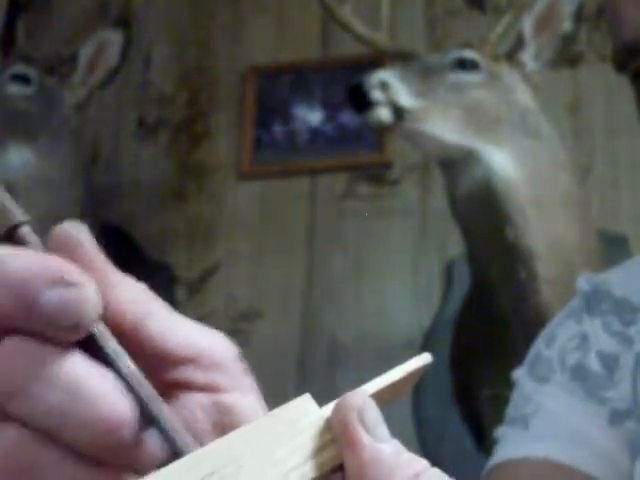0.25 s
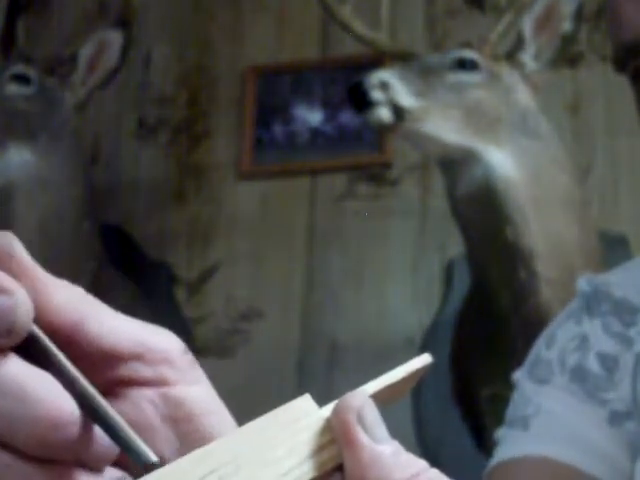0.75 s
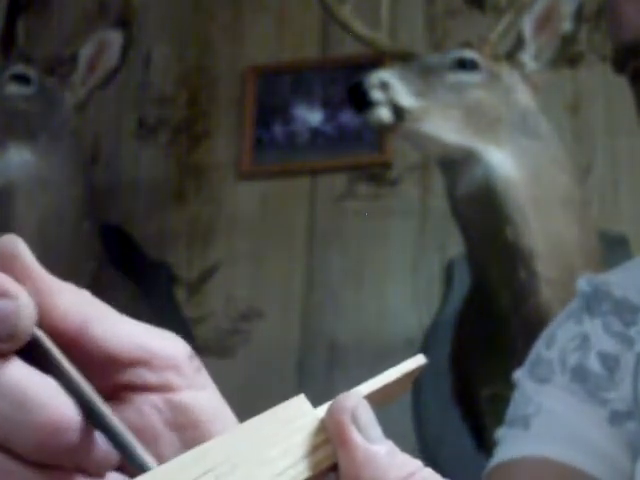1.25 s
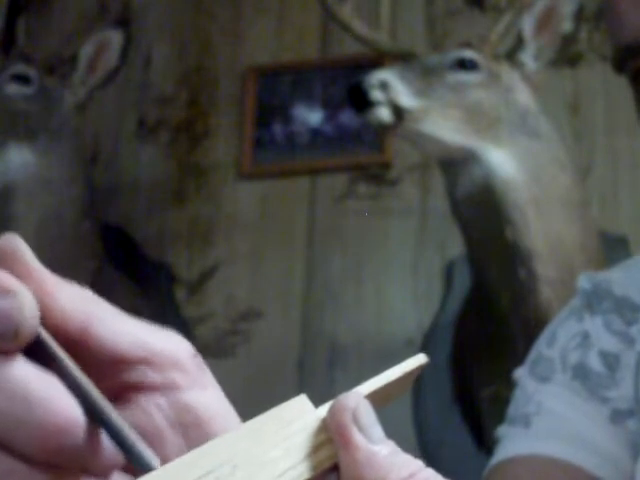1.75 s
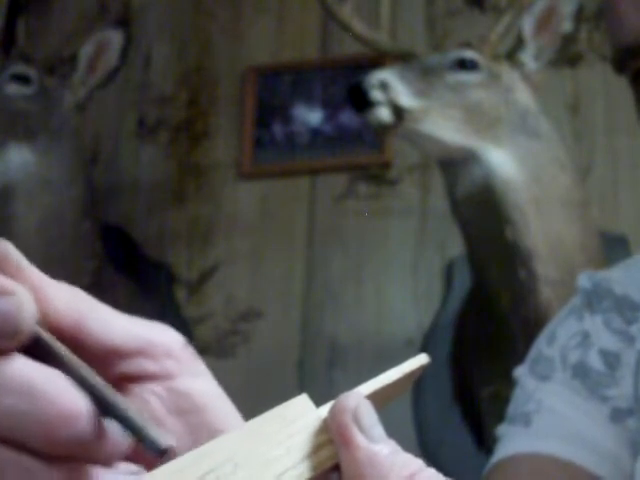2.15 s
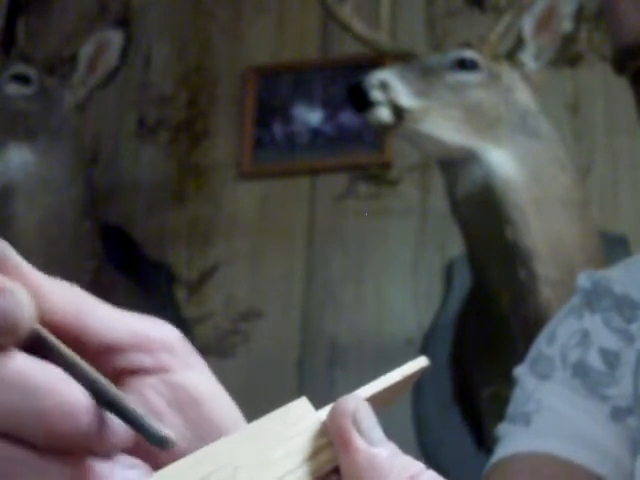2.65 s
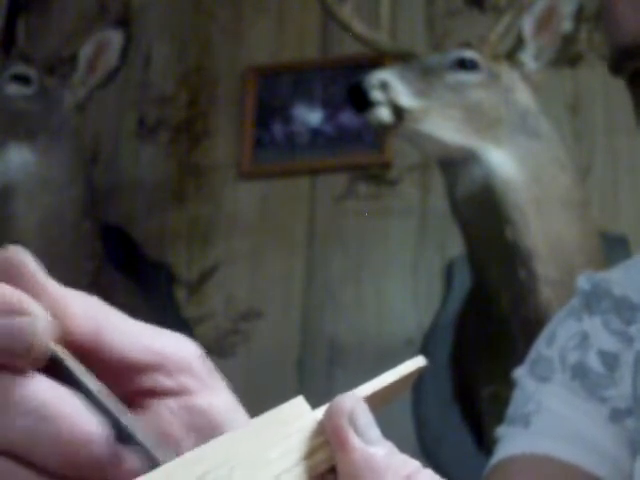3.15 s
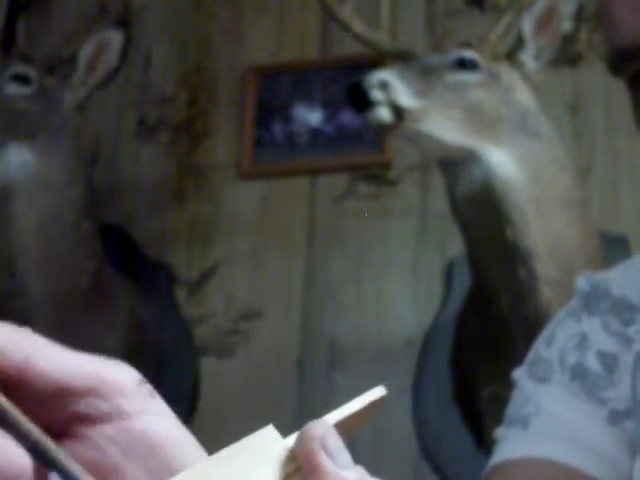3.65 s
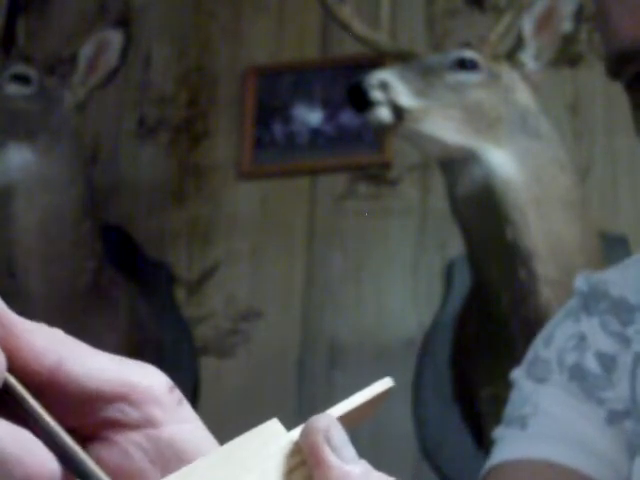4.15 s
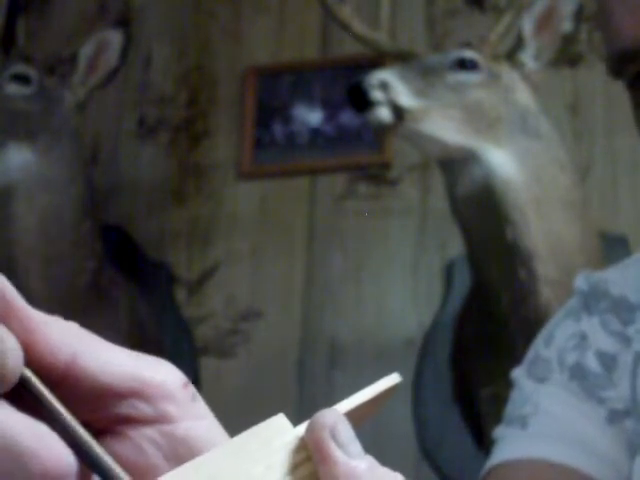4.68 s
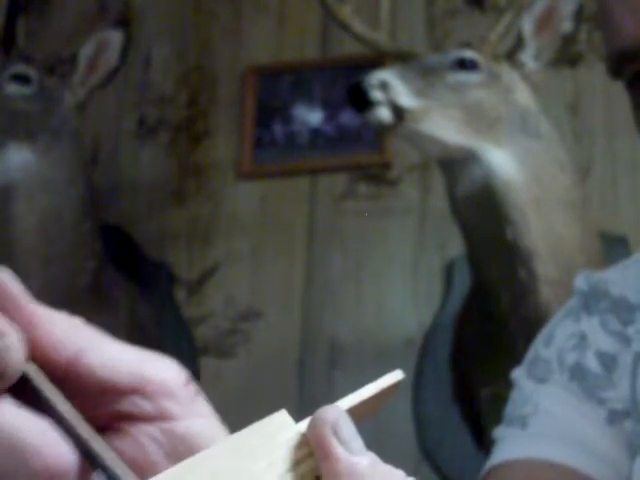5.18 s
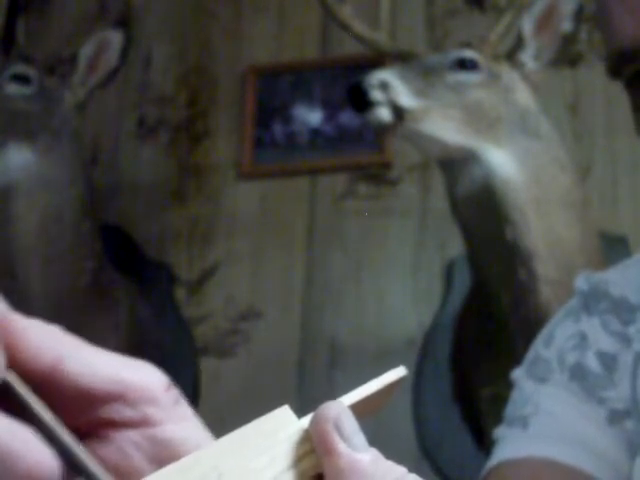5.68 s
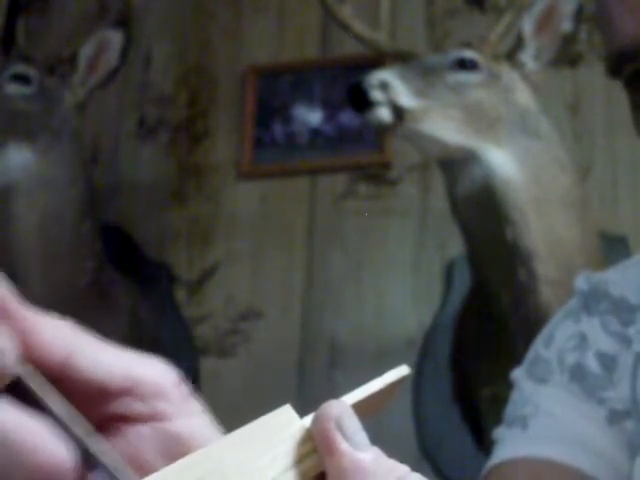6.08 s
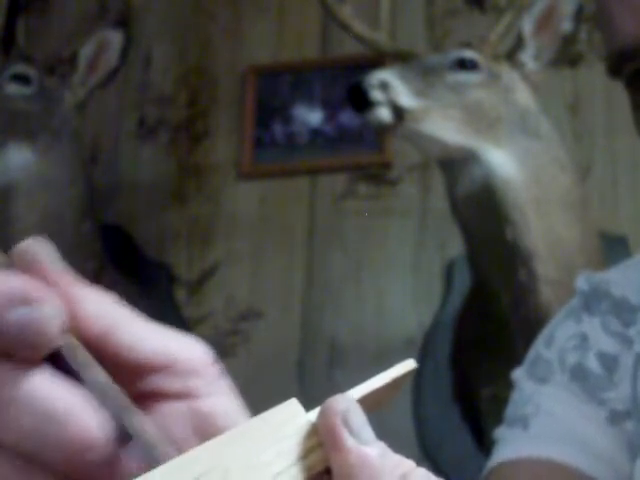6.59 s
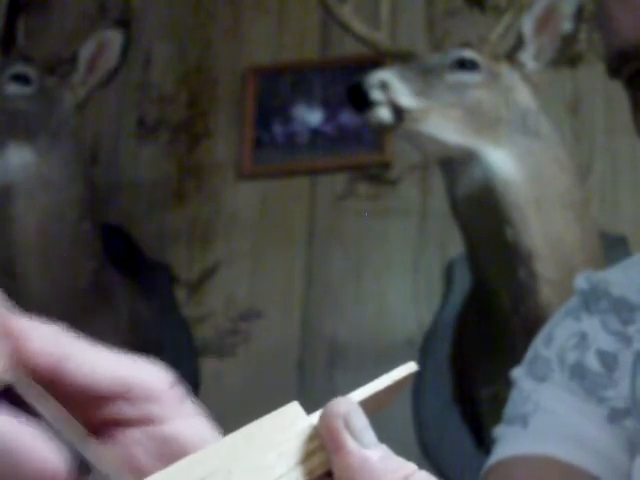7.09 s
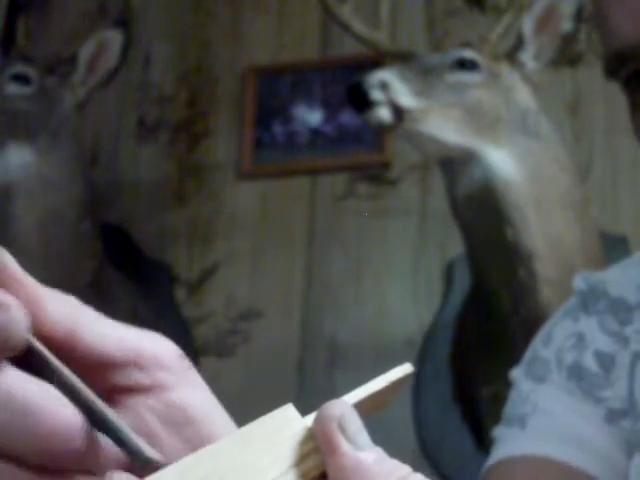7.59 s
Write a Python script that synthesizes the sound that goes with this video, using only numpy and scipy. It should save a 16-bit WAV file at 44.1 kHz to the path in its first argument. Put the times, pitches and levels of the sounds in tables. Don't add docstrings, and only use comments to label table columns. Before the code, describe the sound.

Wood scraped on wood yelps nasally twice, clucks in a string of short sharp cuts, then yelps softly to firmly and ends with two jabs.

```python
import sys
import numpy as np
from scipy import signal
from scipy.fft import rfft, irfft, next_fast_len
from scipy.io import wavfile
from scipy.ndimage import map_coordinates

SR = 44100
rng = np.random.default_rng(int(sys.argv[2]) if len(sys.argv) > 2 else 0)


def amplitude_ratio(level_db):
    exponent = np.asarray(level_db, float) / 20
    return 10 ** exponent


def generate_wav(signal):
    frames = np.transpose(np.atleast_2d(signal))
    scaled = np.clip(frames, -1, 1) * 32767
    pcm = np.round(scaled).astype(np.int16)
    wavfile.write(sys.argv[1], SR, pcm)


N = 345300

# frequency_hz, density_db
HUSH_COLOUR = [(12, -39), (20, -1.5), (61, -4.5), (139, -9.5), (235, -9.5), (302, -11.5), (357, -12),
               (753, -18.5), (818, -17.5), (1420, -22), (1550, -22.5), (12000, -41.5), (15000, -57)]
# frequency_hz, rms_db
WHINE = (11800, -103)
# centre_hz, width_hz
HOUSING_DIP = (7850, 420)
# frequency_hz, t60_s
ROOM_DECAY = [(400, 0.15), (1000, 0.24), (1500, 0.18), (2200, 0.23), (3400, 0.24), (5000, 0.31),
              (7000, 0.25), (12000, 0.27)]
# centre_hz, width_hz, level_db
BOX_MODES = [(657, 430, -10.5), (920, 146, -5), (1349, 291, 4), (1893, 263.5, 5.5), (2100, 213, 3),
             (2897, 204, 4.5), (3450, 191, 2.5), (4036, 783, -10.5), (4814, 210, -11.5), (6530, 430, -11),
             (7300, 100, -42.5), (8120, 170, -24), (11940, 490, -27)]
# centre_hz, width_hz, level_db
PLATE_MODES = [(1351, 31, -18.5), (3420, 38, -0.5), (6600, 67, -6.5)]
# centre_hz, width_hz, level_db
THUD_MODE = (430, 330, -15)
# centre_hz, width_hz, level_db
SQUEAK_MODE = (1373, 60, 10)
# frequency_hz, level_db
CRACK_COLOUR = [(11000, -88), (12300, -36), (14800, -35.5), (15800, -56.5)]
# frequency_hz, level_db
DRAG_COLOUR = [(300, 5), (1500, -6), (4000, -3), (7000, 7), (12000, 10)]
# frequency_hz, level_db
GRIT_COLOUR = [(300, -12.5), (1500, -4.5), (3000, 3.4), (4500, 1.5), (7000, 10), (9000, 10), (12000, 5)]
# frequency_hz, level_db
SLIP_COLOUR = [(300, 14), (1000, 0), (3500, -0.95), (5000, -7), (7000, -4), (8500, 0), (12000, -5)]
# start_s, length_s, level_db
RETURN_STROKES = [
    (-.06, 0.13, -56.5),
    (0.289, 0.13, -58),
    (4.77, 0.12, -73.5),
    (5.206, 0.1, -65.5),
    (5.57, 0.087, -62.5),
    (5.931, 0.11, -60),
    (6.284, 0.12, -61),
    (6.622, 0.12, -58),
    (6.949, 0.15, -61.5),
    (7.305, 0.093, -72),
]
# start_s, peak_db
TOUCHES = [
    (4.461, -61),
    (5.728, -61),
]
# start_s, peak_db, length_s, swell_db, strike_db
JABS = [(1.165, -24, 0.022, -3, -11), (1.39, -18.5, 0.025, 2.5, -15), (1.614, -21.5, 0.033, -3, 9.5),
        (1.851, -18.5, 0.025, 4, 0.5), (2.092, -19.5, 0.022, 9, 3), (2.343, -17, 0.026, -1.5, 0.5),
        (2.602, -17, 0.025, 4.5, 4), (2.875, -16.5, 0.027, 4, -3), (3.21, -16.5, 0.022, -1.5, 3.5),
        (7.549, -17.5, 0.028, 2.5, 0), (7.757, -12.5, 0.029, 5, -1)]
# start_s, rise_s, fall_s, peak_db
CHATTERS = [
    (5.05, 0.034, 0.063, -62),
    (5.765, 0.0043, 0.053, -51),
    (6.116, 0.0043, 0.077, -57),
    (6.47, 0.044, 0.011, -44),
    (6.799, .035, .05, -40),
    (7.126, 0.032, 0.043, -39),
]
# time_s, slip_rate_hz, level_db
LIGHT_YELPS = [
    [(4.608, 812, -67), (4.64, 778, -52.5), (4.662, 820, -47.5), (4.673, 957, -47.5), (4.685, 846, -45.5),
     (4.71, 787, -68), (4.73, 765, -73)],
    [(5.005, 876, -60), (5.02, 759, -56), (5.085, 712, -46.5), (5.115, 723, -53), (5.14, 773, -50),
     (5.168, 872, -60.5), (5.18, 772, -70), (5.215, 770, -69)],
    [(5.403, 697, -67), (5.42, 700.6, -54), (5.452, 719, -46.5), (5.478, 701, -36), (5.5, 750, -44),
     (5.515, 754, -42), (5.54, 750, -63)],
    [(5.745, 699, -69), (5.778, 734.4, -46.5), (5.8, 713, -36), (5.855, 721, -33), (5.878, 724.4, -39),
     (5.893, 920, -42), (5.902, 1040, -48)],
]
# start_s, length_s, locked_rate_hz, peak_db, roll_0_to_1 (swing of the peg round its oval)
FIRM_YELPS = [
    (6.105, 0.15, 685.7, -30, 0.72),
    (6.453, 0.15, 685.2, -30.5, 0.44),
    (6.786, .16, 680.2, -31, 0.12),
    (7.115, 0.15, 672, -28.5, 0),
]
# time_s, slip_rate_hz, level_db
ROUND_YELPS = [
    [(0.117, 996, -64), (.122, 938, -54), (.138, 739, -42.5), (.175, 727, -35.5), (.215, 741.5, -31.5),
     (.238, 807, -33), (.252, 1032, -37), (.264, 1210, -47)],
    [(.466, 1070, -54), (.47, 1015, -47.5), (.48, 921, -41.5), (.503, 761, -37.5), (.52, 734.6, -34.5),
     (.56, 738.7, -32), (.585, 764, -32), (.597, 1010, -41.5), (.607, 1100, -46)],
]

SMOOTH = .02
FRAY = 0.24
SHINE_DB = 2


def along(points, hz):
    f, v = np.transpose(points)
    return np.interp(np.log(hz + 1), np.log(f + 1), v)


def filtered(x, response):
    m = next_fast_len(len(x) + SR // 2)
    spectrum = rfft(x, m) * response(np.fft.rfftfreq(m, 1 / SR))
    return irfft(spectrum, m)[:len(x)]


def coloured(x, points):
    return filtered(x, lambda f: amplitude_ratio(along(points, f)))


def resonance(f, centre_hz, width_hz, db):
    return amplitude_ratio(db) * 1j * f * width_hz / (centre_hz ** 2 - f * f + 1j * f * width_hz)


def hush():
    noise = filtered(rng.standard_normal(N),
                     lambda f: amplitude_ratio(along(HUSH_COLOUR, f)) / (1 + (f / 12700) ** 30))
    hz, rms_db = WHINE
    line = np.sqrt(2) * amplitude_ratio(rms_db) * np.sin(2 * np.pi * hz * np.arange(N) / SR)
    return amplitude_ratio(-68.5) * noise / noise.std() + line


def room(x):
    hz, t, z = signal.stft(rng.standard_normal(SR // 2), SR, nperseg=256)
    decay = amplitude_ratio(-60 * t / along(ROOM_DECAY, hz)[:, None])
    tail = signal.istft(z * decay, SR, nperseg=256)[1]
    delayed = np.pad(x, (150, 0))
    return signal.fftconvolve(delayed, tail / np.linalg.norm(tail))[:N]


def box(f):
    ring = sum((-1) ** k * resonance(f, *row) for k, row in enumerate(BOX_MODES))
    first, second, third = [resonance(f, *row) for row in PLATE_MODES]
    ring = ring + first + second - third
    ring = ring * (1j * f / 520) ** 2 / (1 + 1j * f / 520) ** 2
    ring = ring * (amplitude_ratio(-36) + amplitude_ratio(-13) / (1 + (f / 13300) ** 60) + 1 / (1 + (f / 12250) ** 60))
    return ring / np.sqrt(np.mean(abs(ring) ** 2))


def returns():
    t = np.arange(N) / SR
    touch = np.zeros(N)
    for s, length, db in RETURN_STROKES:
        touch += amplitude_ratio(db) * np.sin(np.pi * np.clip((t - s) / length, 0, 1)) ** 0.59
    clumps = amplitude_ratio(1.23 * map_coordinates(rng.standard_normal(N // 400 + 4), [np.arange(N) / 400]))
    squeak = lambda f: 1 + resonance(f, *SQUEAK_MODE)
    return filtered(touch * clumps * rng.standard_normal(N),
                    lambda f: amplitude_ratio(along(DRAG_COLOUR, f)) * squeak(f))


def stroke(rows):
    s, *cols = np.transpose(rows)
    at = np.arange(round(s[0] * SR), min(round(s[-1] * SR), N))
    rate_hz, db, rough = [np.interp(at / SR, s, c) for c in cols]
    rough = np.clip(rough, 0, .95)
    chance = rng.standard_normal((400, 3))
    sand = rng.standard_normal(SR // 2)[:len(at)]

    wander = map_coordinates(chance[:, 0], [np.arange(len(at)) * 260 / SR])
    turns = np.cumsum(rate_hz * (1 + 0.076 * rough * wander)) / SR
    whole = np.arange(int(turns[-1]))
    jitter = chance[whole, 1] * (0.005 + 0.12 * np.interp(whole, turns, rough))
    when = np.interp(whole + jitter, turns, at)
    gain = amplitude_ratio(db) * np.sqrt((1 - rough) * SR / rate_hz)
    size = np.interp(when, at, gain) * amplitude_ratio(chance[whole, 2] * 4.5 * np.interp(when, at, rough))

    spots = when.astype(int)[:, None] + np.arange(-8, 9)
    lag = spots - when[:, None]
    shape = size[:, None] * np.sinc(lag) * np.cos(lag * np.pi / 18) ** 2
    slips = np.bincount(spots.ravel(), shape.ravel(), N + SR)

    sharp = np.clip(1 + (np.interp(np.arange(N + SR), at, db) + 36.5) / 22, .05, 1)
    gate = 1 + 0.64 * np.cos(2 * np.pi * turns)
    dust = 0.47 * amplitude_ratio(db) * np.sqrt(rough + 0.002) * gate * sand
    grit = np.bincount(at, dust, N + SR) * sharp ** .4
    return np.array([sharp * slips, (1 - sharp) * slips, grit])


def chatter(s, rise, fall, db):
    loose = 0.23
    curve = [(0, -14, loose), (rise, 0, .5 * loose), (rise + fall, -20, loose)]
    return [(s + t, 950 - 700 * t, db + under_db, rough) for t, under_db, rough in curve]


def jab(s, db, length, swell_db):
    db = db - 13.5
    high_hz = 930 + 25 * rng.standard_normal()
    low_hz = 680 + 18 * rng.standard_normal()
    high = [(s, 1.04 * high_hz, db + .3, .4),
            (s + .6 * length, 0.87 * high_hz, db + swell_db / 2 - 0.5, .4),
            (s + length, 0.74 * high_hz, db - 7.0, .4)]
    low = [(s, low_hz, db - 7.0, .4),
           (s + 0.91 * length, low_hz, db + swell_db - 3.0, .33),
           (s + length, low_hz, db + swell_db - 9.5, .3),
           (s + length + .006, low_hz, db - 11.0, .5)]
    return stroke(high) + stroke(low)


def light_yelp(rows):
    peak_db, peak_s = max((db, s) for s, hz, db in rows)
    weak = .005 * (-33 - peak_db)
    curve = []
    for s, hz, db in rows:
        blur = SMOOTH + .04 * max(peak_db - db - 4, 0)
        limit = 0.435 if s < peak_s else 0.51 * FRAY
        curve.append((s, hz, db, min(blur, limit) + weak))
    return curve, 1.5


def firm_yelp(s, length, hz, db, roll):
    land_s, grab_s = .0025, 0.0077
    grab_hz, grab_db = 1016, db - 19
    rasp = SMOOTH + 0.36 * max(1 - roll, 0)
    push = .007 * (db + 31)
    ease = 1.035 + push
    curve = [(s, grab_hz, grab_db - 13, SMOOTH),
             (s + land_s, grab_hz, grab_db, 0.18 * rasp),
             (s + land_s + grab_s, 870, db - 14, 0.47 * rasp),
             (s + land_s + 2 * grab_s, 1.03 * hz, db - 14, rasp),
             (s + 0.413 * length, hz, db - 1.5, .62 * rasp),
             (s + .62 * length, (1.014 + push) * hz, db, SMOOTH),
             (s + 0.8 * length, (1.035 + 1.5 * push) * hz, db - 0.1 - 10.5 * roll, SMOOTH),
             (s + .91 * length, (ease + 0.253 * roll) * hz, db - 15.5, 0.67 * FRAY),
             (s + length, (ease + 0.85 * roll) * hz, db - 33, FRAY)]
    return curve, SHINE_DB + .6 * (db + 30.5)


def round_yelp(rows):
    locked_hz = min(hz for s, hz, db in rows)
    curve = [(s, hz, db, .012 + 0.72 * (hz / locked_hz - 1) ** 2) for s, hz, db in rows]
    return curve, SHINE_DB + 4


def peg():
    draws, jabs = np.zeros((3, N + SR)), np.zeros((3, N + SR))
    shine = np.zeros(N + SR)
    yelps = [round_yelp(rows) for rows in ROUND_YELPS]
    yelps += [firm_yelp(*row) for row in FIRM_YELPS]
    yelps += [light_yelp(rows) for rows in LIGHT_YELPS]
    for rows, bright_db in sorted(yelps):
        draws += stroke(rows)
        start = round(rows[0][0] * SR)
        shine[start:start + SR // 5] = amplitude_ratio(bright_db) - 1
    for row in CHATTERS:
        draws += stroke(chatter(*row))
    for s, db, length, swell_db, strike_db in JABS:
        start = round(s * SR)
        jabs[0, start] = amplitude_ratio(db + strike_db)
        jabs += jab(s, db, length, swell_db)
        bright_db = min(1.04 * (db + 21), 4.5)
        shine[start:start + SR // 10] = amplitude_ratio(bright_db) - 1
    for s, db in TOUCHES:
        draws[1, round(s * SR)] = amplitude_ratio(db + 14)

    sharp, blunt, grit = draws + jabs
    slips = sharp + 3.3 * filtered(blunt, lambda f: 1 / (1 + 1j * f / 2400) ** 2)
    both = coloured(slips, SLIP_COLOUR) + coloured(grit, GRIT_COLOUR)
    squeak = filtered(both * shine, lambda f: 1 / (1 + (4500 / (f + 1)) ** 6))
    return (both + squeak)[:N], jabs.sum(axis=0)[:N]


def scene():
    force, jabs = peg()
    drag = returns()
    thud = filtered(jabs, lambda f: resonance(f, *THUD_MODE))
    crack = coloured(jabs + amplitude_ratio(1) * drag, CRACK_COLOUR)
    call = filtered(force + drag, box) + thud + crack
    return (amplitude_ratio(-1.0) * call + amplitude_ratio(-7) * room(call) + hush())[None]


def band_limit(x):
    return signal.sosfilt(signal.butter(12, 15590, fs=SR, output="sos"), x)


def record(dry):
    c, w = HOUSING_DIP
    dip = lambda f: (c * c - f * f + .08j * f * w) / (c * c - f * f + 1j * f * w)
    mix = filtered(dry[0], dip)[None]
    return band_limit(mix)


dry = scene()
out = record(dry)
generate_wav(out)
```